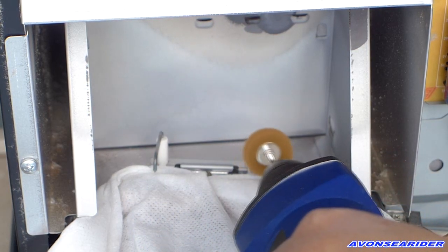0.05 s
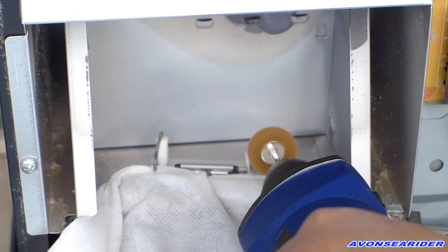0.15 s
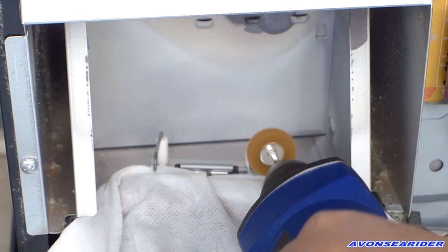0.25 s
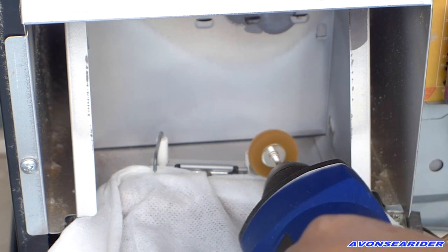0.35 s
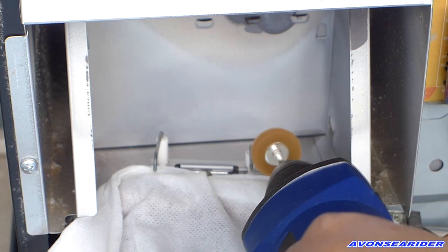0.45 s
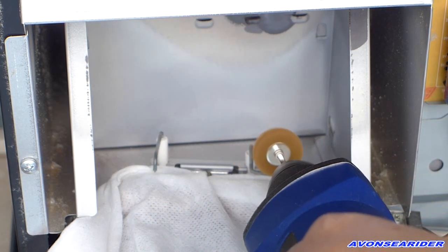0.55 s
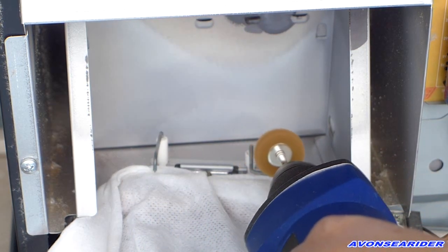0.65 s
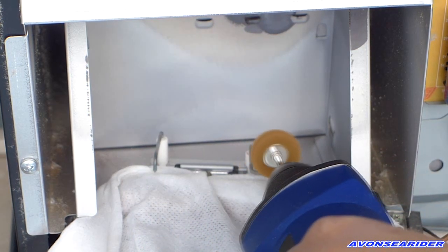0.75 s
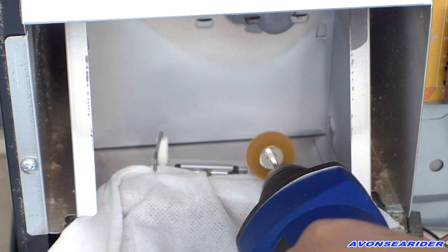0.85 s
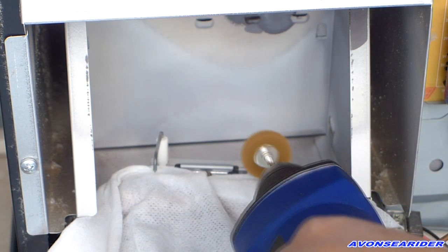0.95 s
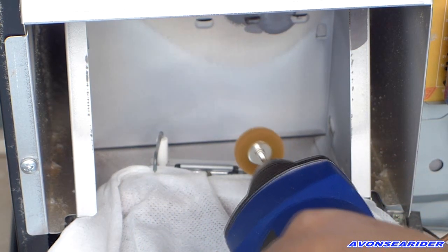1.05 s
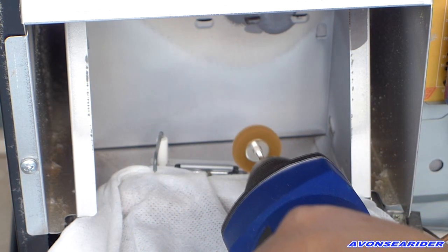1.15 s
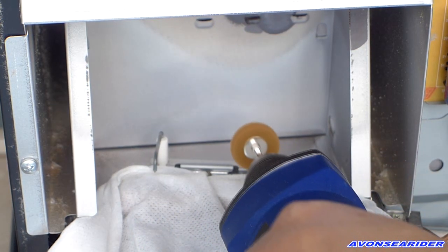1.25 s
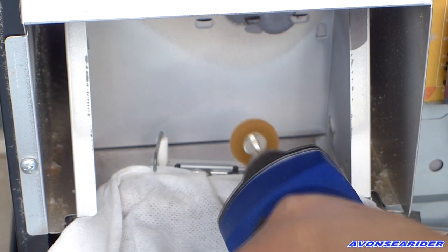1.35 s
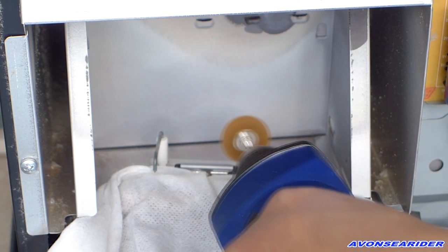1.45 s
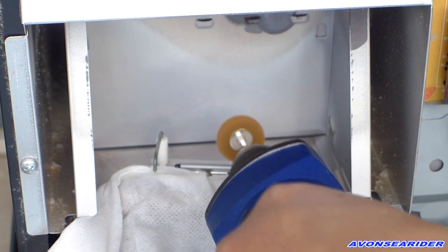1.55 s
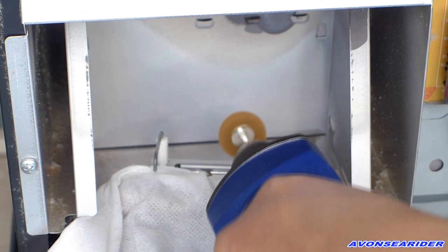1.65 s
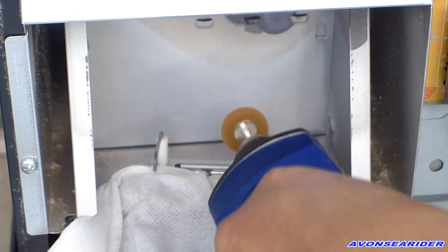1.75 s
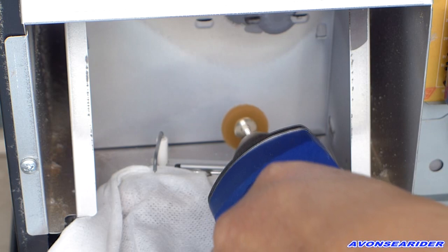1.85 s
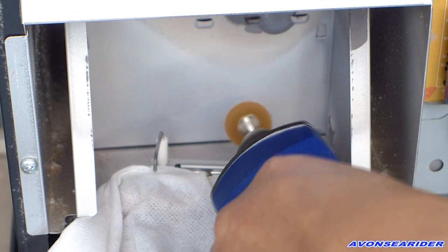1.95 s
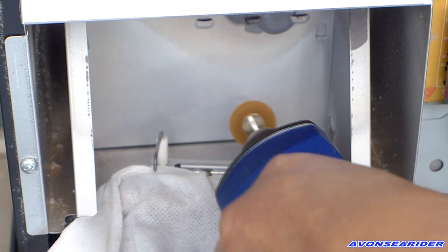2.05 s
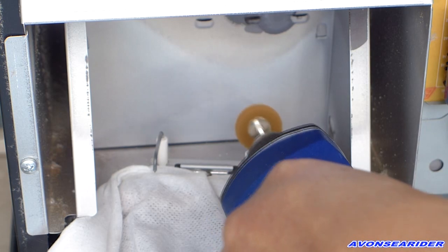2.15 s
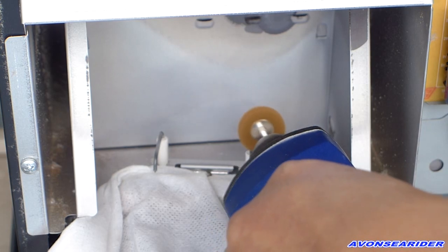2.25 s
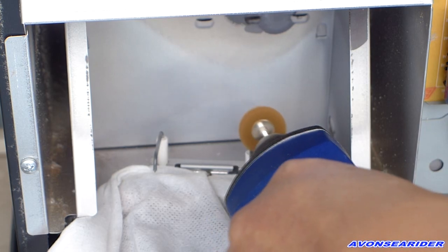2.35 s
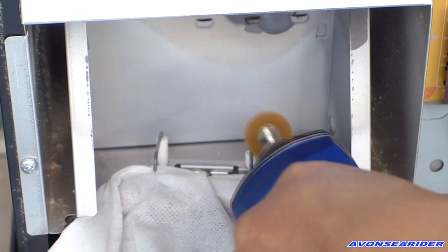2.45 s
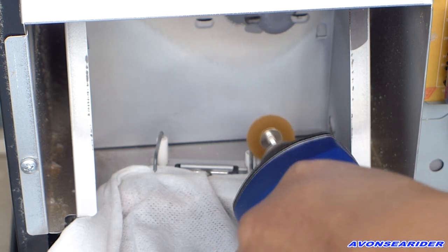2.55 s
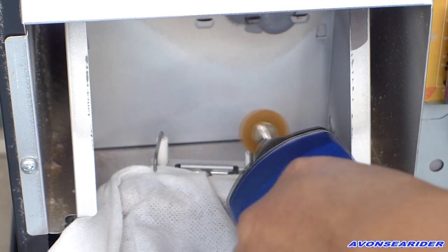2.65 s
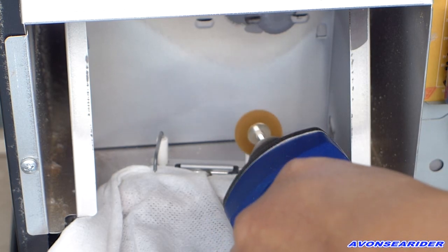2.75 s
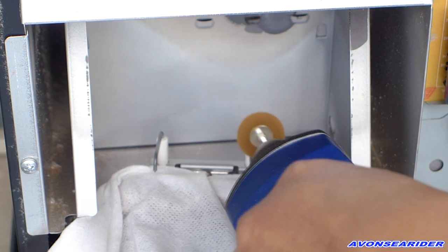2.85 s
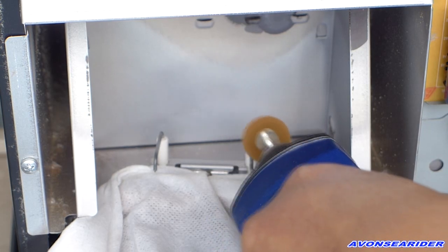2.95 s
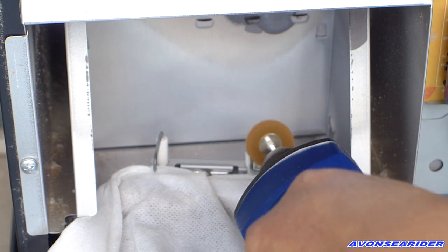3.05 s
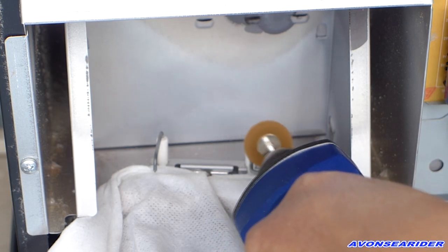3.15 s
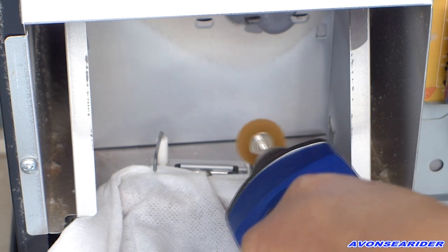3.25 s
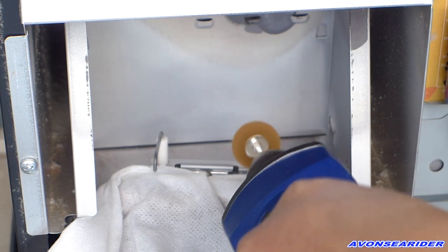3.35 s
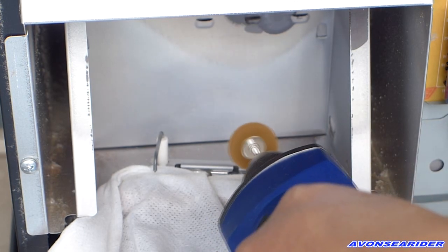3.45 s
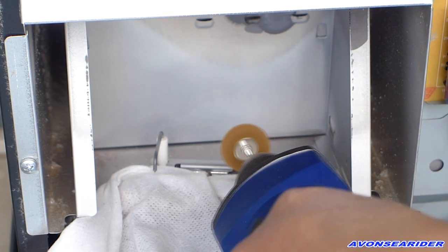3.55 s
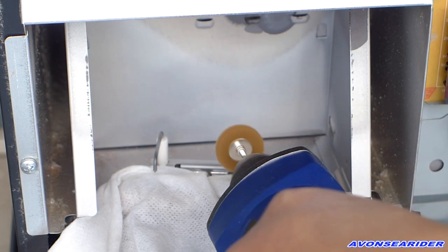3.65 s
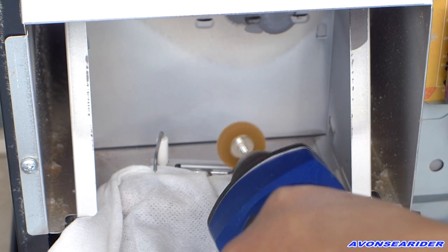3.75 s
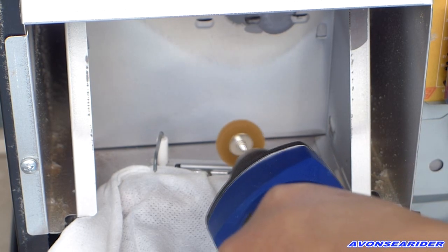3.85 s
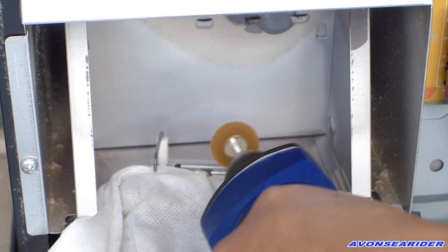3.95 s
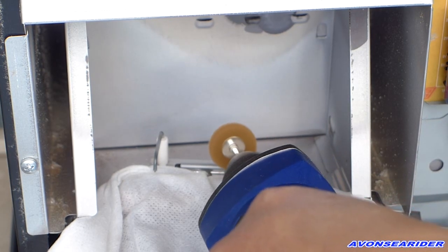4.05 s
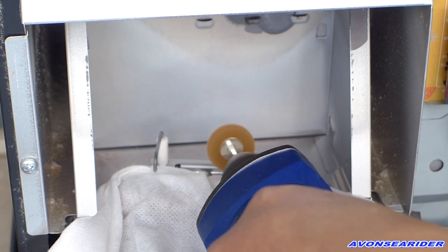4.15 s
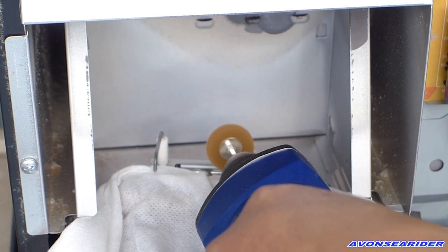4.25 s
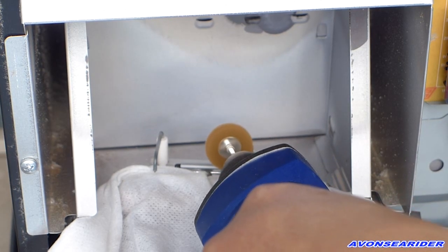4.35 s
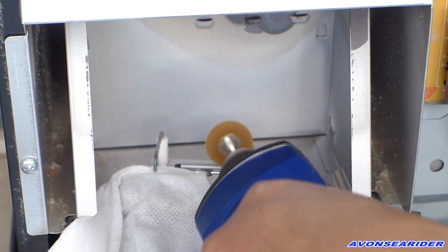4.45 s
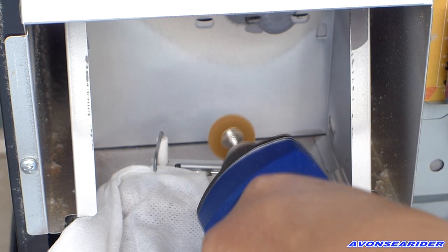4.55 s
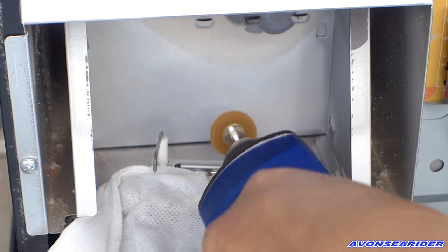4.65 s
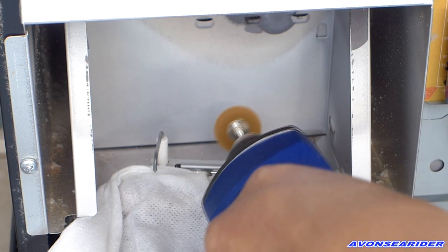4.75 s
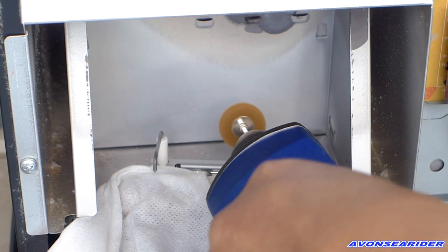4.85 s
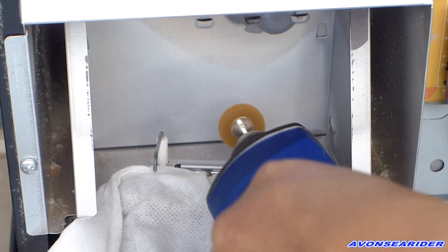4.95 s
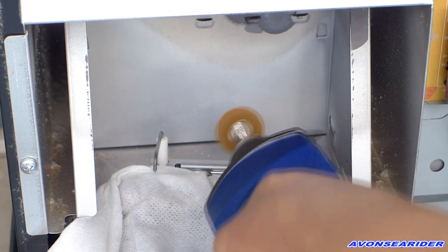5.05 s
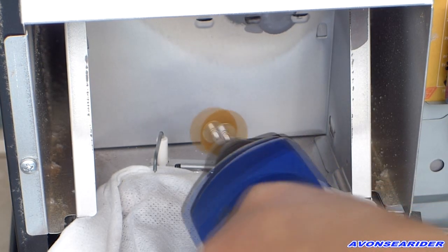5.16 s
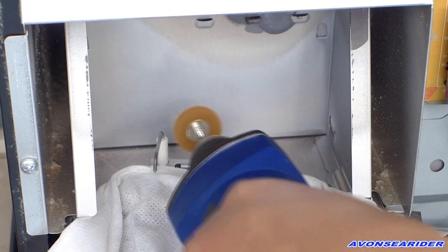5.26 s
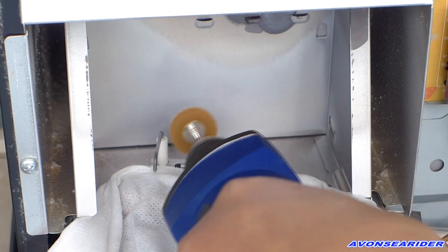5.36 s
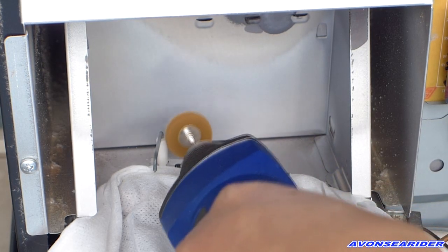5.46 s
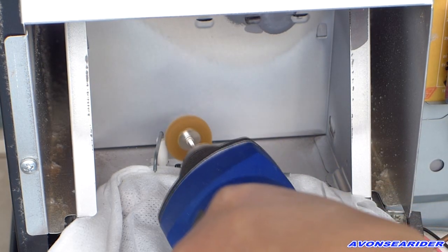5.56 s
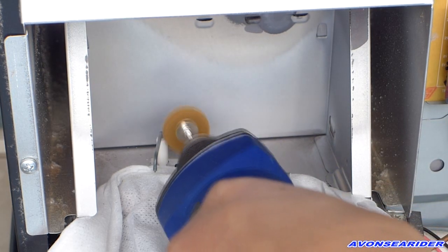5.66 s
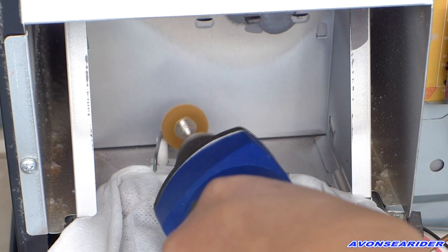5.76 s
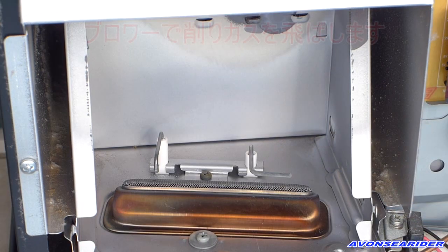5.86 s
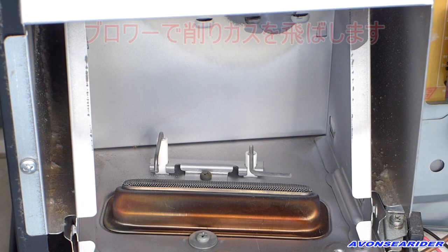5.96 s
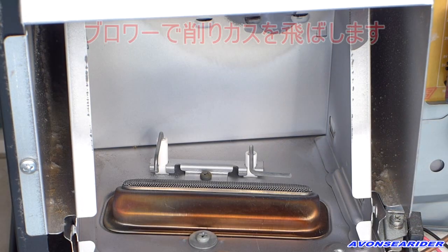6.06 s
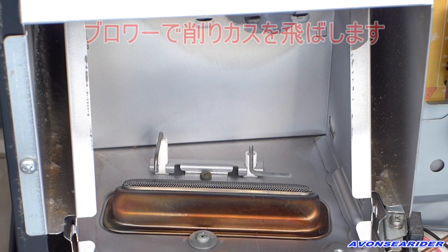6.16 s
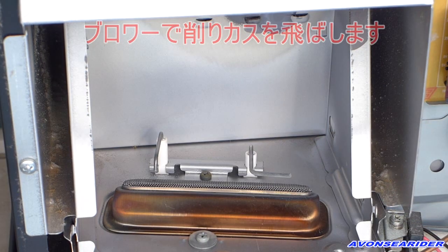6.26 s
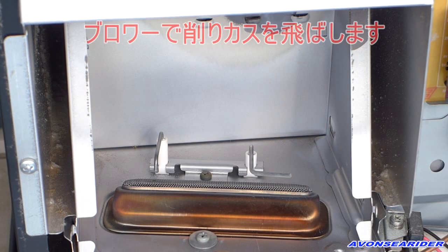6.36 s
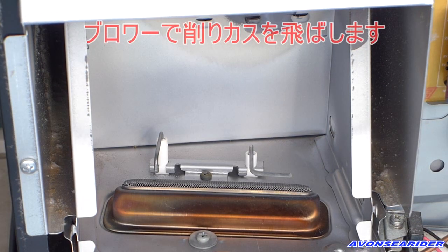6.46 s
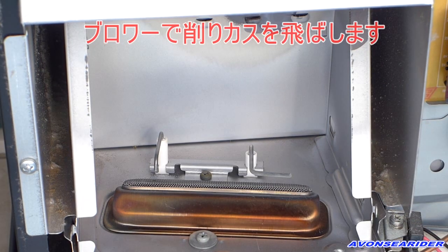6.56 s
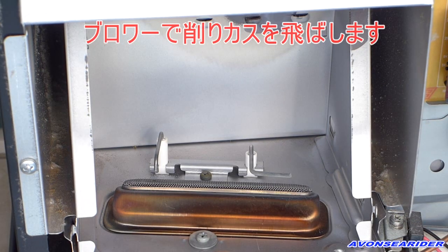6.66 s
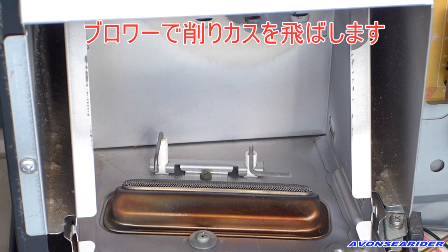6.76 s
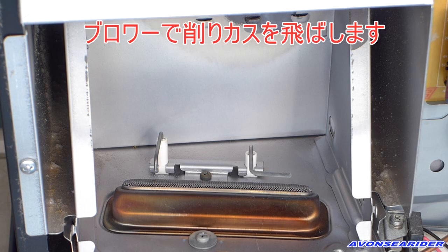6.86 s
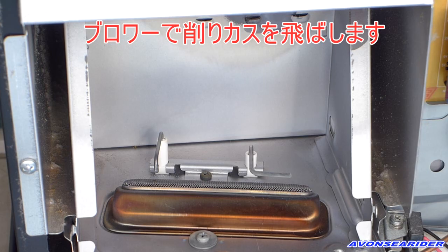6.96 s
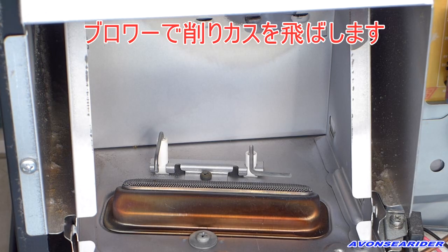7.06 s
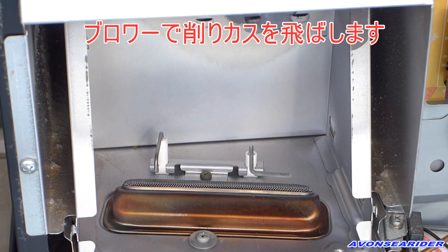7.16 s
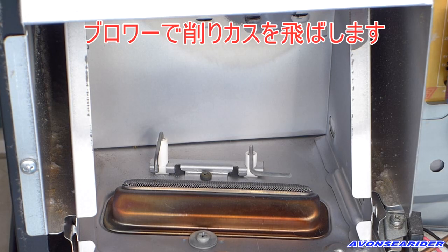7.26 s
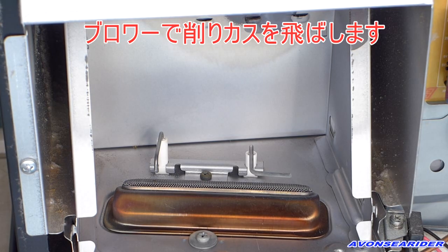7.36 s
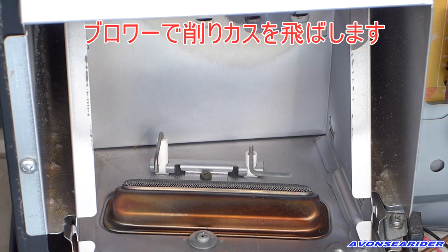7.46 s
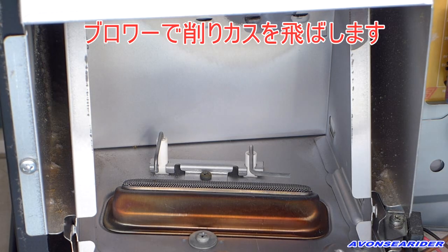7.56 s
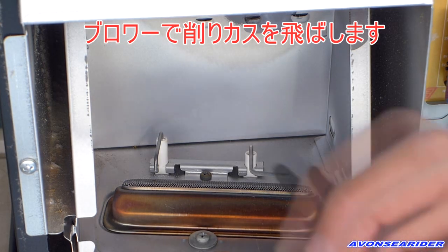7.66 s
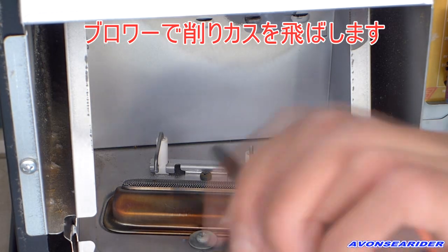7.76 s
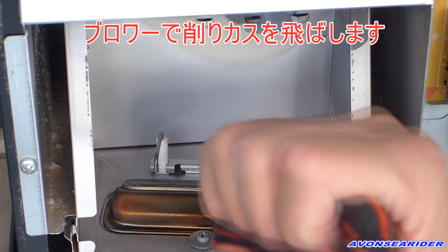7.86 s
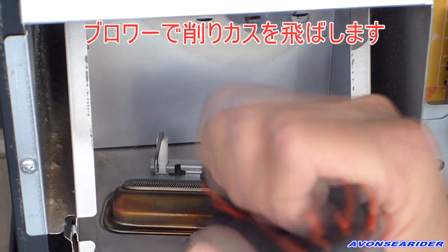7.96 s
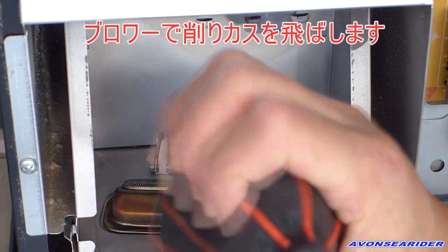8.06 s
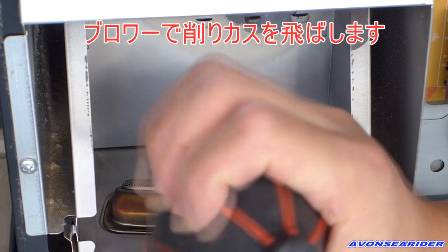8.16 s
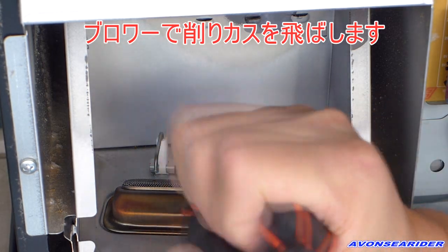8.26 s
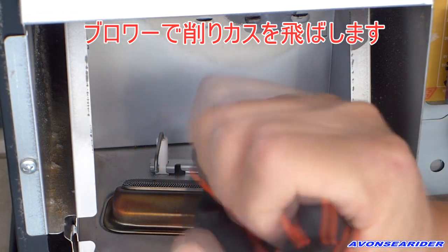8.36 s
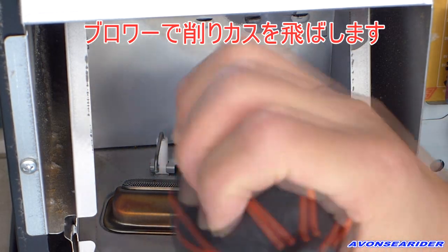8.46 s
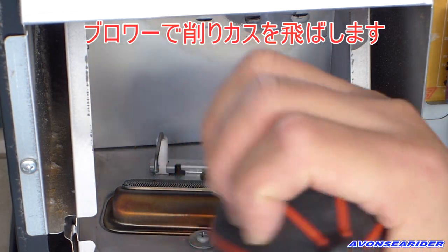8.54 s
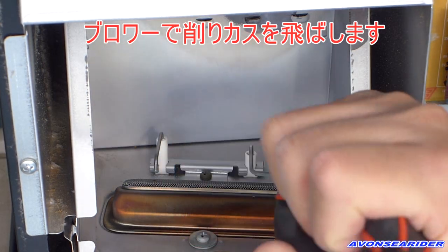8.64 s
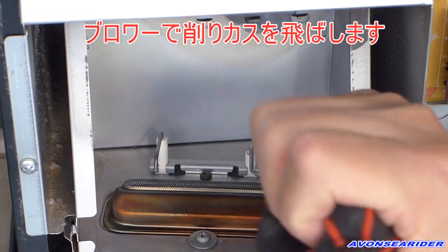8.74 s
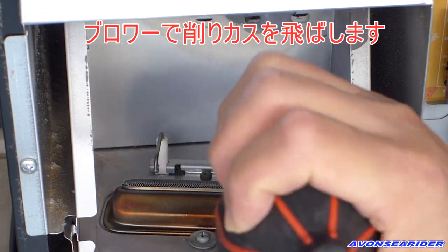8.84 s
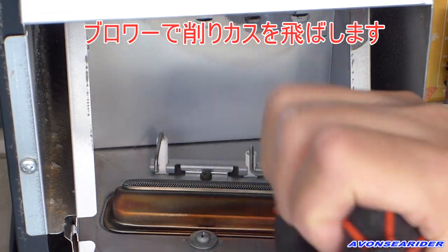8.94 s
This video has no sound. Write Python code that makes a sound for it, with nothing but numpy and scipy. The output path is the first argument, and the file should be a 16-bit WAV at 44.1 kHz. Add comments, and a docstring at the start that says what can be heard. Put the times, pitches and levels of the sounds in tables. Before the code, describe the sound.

Close up in a quiet room, a small electric rotary tool whines steadily inside a sheet-metal box, its wheel rubbing a plug with a buzzy, gritty, wavering rasp. It cuts off abruptly. Fingers rustle on a rubber bulb with a faint hollow note, a near-silent pause follows, then three quick hissing puffs, each trailed by a thin refill hiss.

```python
"""In a quiet room with a sheet-metal heater, a small mains rotary tool whines inside the heater box.
Its wheel rubs a plug: tones at multiples of the shaft speed, plus brush noise and grit; then it cuts off.
A rubber blower bulb is then handled (grainy shaped noise and a hollow note) and squeezed three times:
each puff is a burst of noise, followed by the thinner hiss of the bulb refilling through its valve."""
import sys
import numpy as np
from scipy import signal
from scipy.io import wavfile
from scipy.ndimage import uniform_filter1d

SR = 44100
rng = np.random.default_rng(int(sys.argv[2]) if len(sys.argv) > 2 else 0)


def log_audio(samples):
    """Write samples as a 16-bit WAV file to the path given in sys.argv[1]."""
    # one column per channel
    frames = np.atleast_2d(samples).T
    # limit to full scale, then quantise
    limited = np.clip(frames, -1, 1)
    pcm = np.round(limited * 32767).astype(np.int16)
    wavfile.write(sys.argv[1], SR, pcm)


N = 396900

# Noise spectra are scaled to an overall strength of 1 later, so their levels are relative, per Hz.
# how alike left and right are: [f/Hz, likeness from 0 to 1]
LIKENESS = [(60, 0.57), (180, 0.96), (550, 0.89), (1650, 0.82), (4970, 0.7), (15000, 0.73)]
# steady wash of the room: [f/Hz, level/dB]
ROOM = [(12, -17.5), (25, -17.5), (40, -36.5), (62, -43.5), (100, -48), (140, -13), (170, -10), (254, -8),
        (381, -5), (613, -6), (1130, -10), (1480, -13), (1810, -16.5), (2980, -32), (15500, -38.5)]
ROOM_DB = -43

# fingers and sleeve on rubber and cloth; the body levels are raised by BODY_LIFT_DB:
# [peak t/s, rustle level/dB, rise t/s, fall t/s, body level against rustle/dB]
HANDLING = [(6.192, -35.5, 0.017, 0.078, -2), (6.286, -51, .035, .06, 1), (6.395, -50, 0.068, .1, -4),
            (6.449, -45, .03, .2, 0), (6.537, -37.5, 0.083, 0.1, -8), (6.631, -23.5, 0.017, 0.064, -8),
            (6.71, -38, 0.026, 0.2, -10), (6.77, -26.5, .15, 0.065, -5), (7.256, -55.5, .1, 0.79, -25),
            (7.51, -63, 0.25, .15, -25.5), (7.803, -56, .06, .1, -28)]
BODY_LIFT_DB = 2.0
# rustle of the touches: [f/Hz, level/dB]
RUSTLE = [(1060, -41), (1800, -4.5), (2750, -5.5), (4090, -4.5), (4430, -3), (7820, -4.5), (12400, -8.5),
          (15500, -24)]
# the bulb's dull body sound: [f/Hz, level/dB]
BODY = [(150, -60), (400, -21), (800, -15), (1700, -21), (2600, -36)]
# resonances of the bulb: [f/Hz, width f/Hz, lift level/dB]
BULB_MODES = [(1034, 59, 10), (1320, 130, 11)]
# taps on the hollow bulb: [peak t/s, level/dB, rise t/s, fall t/s]
TAPS = [(6.454, -27.5, .014, .075), (6.52, -38, 0.1, 0.14)]
HOLLOW_HZ, WOBBLE_WIDTH_HZ = 598, 120.0
TOUCH_SPAN_DB = 25  # level change over one rise or fall time

# squeezes of the bulb; a negative lead puts the first rush after the peak:
# [peak t/s, jet level/dB, rise t/s, burst t/s, push after burst t/s, roar level against jet/dB,
#  first-rush level/dB, first-rush lead t/s]
PUFFS = [(7.962, -12.5, 0.072, 0.0049, 0.051, -14, -16.5, 0.011),
         (8.329, -14, 0.039, 0.0083, 0.069, -14.5, -30.5, 0.0018),
         (8.71, -16, 0.043, 0.03, 0.044, -14, -29, -0.011)]
# levels against the peak of a puff, and times in seconds
RISE_DB, SAG_DB, SAG_S, PUSH_DB, FALL_DB, FALL_S = -40, -7.5, 0.025, -11, -37.5, 0.075
RUSH_RISE_S, RUSH_FALL_S = 0.031, 0.062
# air leaving the bulb: [f/Hz, level/dB]
JET = [(1470, -36), (2500, -2), (3140, -9.5), (4010, -2), (4370, -7), (5210, -2.5), (6400, -5), (12000, -7),
       (15500, -18)]
# air striking the metal: [f/Hz, level/dB]
ROAR = [(120, -58), (300, -17), (700, -1.5), (1400, 4), (2300, 5.5), (3500, -15)]
# refills through the valve: [start t/s, end t/s, level at start/dB, level just before the end/dB]
REFILLS = [(8.107, 8.235, -32.5, -29), (8.498, 8.62, -32, -32.5), (8.876, 9.05, -33.5, -34.5)]
VALVE_OPEN_S, VALVE_CLOSE_S = 0.024, 0.03
# hiss of the valve: [f/Hz, level/dB]
VALVE = [(880, -65), (1500, -43), (1820, -34), (2170, -35), (2400, -24), (3380, -23), (4350, -17.5),
         (4800, -10.5), (5350, -13), (6380, -6), (9520, -13), (11400, -0.5), (15500, -30)]

# shaft speed, sagging under load: [t/s, turns f/Hz]
SPEED = [(0.0, 176.66), (0.42, 177.4), (0.6, 176.95), (1.26, 176.8), (1.48, 175.55), (1.94, 175.3),
         (2.1, 174.8), (2.56, 175.3), (2.71, 173.8), (3.45, 173.3), (3.79, 174.65), (4.1, 174.58),
         (4.59, 171.44), (4.82, 169.24), (4.99, 166.6), (5.12, 165.54), (5.55, 173.05), (5.88, 176.36)]
# commutator whine, 24 bars a turn: [t/s, level/dB]
WHINE = [(0.0, -29.5), (1.24, -35), (1.41, -29), (1.71, -44), (1.78, -25), (1.94, -29), (2.03, -22.5),
         (2.24, -28.5), (2.42, -22.5), (2.81, -30), (3.27, -23), (4.2, -22), (4.33, -28.5), (4.55, -14.5),
         (4.68, -20), (4.97, -23.5), (5.15, -19.5), (5.23, -23), (5.47, -12), (5.54, -22), (5.71, -19.5),
         (5.88, -26)]
# the line one mains ripple below the whine swells when the whine dips, and fades when it peaks
LOWER_DB, TRADE, WAVER_DB = -34, 0.8, 1.44
# slowly wavering motor lines: [shaft order, offset in mains ripples, early level/dB, late level/dB]
MOTOR = [(24, 1, -42, -37), (24, -2, -35, -45), (24, 2, -45, -44), (48, 0, -36, -49), (72, 0, -56, -49),
         (71, 0, -58, -50), (22, 0, -42, -38), (23, 0, -39, -38), (25, 0, -43, -40), (26, 0, -44, -43),
         (12, -1, -46, -50), (18, 0, -50, -44), (21, 0, -48, -46), (29, 0, -50, -49)]
RIPPLE_HZ, CUT_S = 100.2, 5.895  # mains ripple; moment when the tool goes silent
# brush and fan noise: [f/Hz, level/dB]
BRUSHES = [(120, -52), (200, -21.5), (769, -10.5), (906, -3.5), (1150, -14.5), (1400, -2), (2130, -8.5),
           (2700, -13.5), (3680, -7), (4110, -6), (4670, -7), (12700, -16), (15500, -39)]
BRUSH_DB = -27.0
# air modes of the heater box: [f/Hz, width f/Hz, lift level/dB]
CABINET = [(995, 66, 9.5), (1340, 69, 3.5), (2350, 680, 6.5), (4030, 200, 3)]
# noise of the grit: [f/Hz, level/dB]
GRIT = [(300, -30), (1000, -12), (3000, -12), (5000, -2), (7500, 0), (9500, -6), (11000, -3), (15600, -20)]
# wheel pressing on the work shakes the housing, before lifts and shake:
# [t/s, order 2 level/dB, order 3 level/dB, order 4 level/dB]
PRESSING = [(0.0, -30.5, -21.5, -36.5), (0.22, -31, -17.5, -30), (0.36, -33, -18.5, -32.5),
            (0.48, -31.5, -15, -24), (0.77, -41.5, -17.5, -31), (0.86, -29.5, -17, -27),
            (1.14, -27, -17.5, -30), (1.27, -39, -24.5, -36.5), (1.4, -31, -33, -36), (1.72, -36, -33, -42),
            (2.19, -50, -49, -44), (2.67, -52, -28.5, -49), (2.84, -45, -38, -42),
            (3.3, -50.5, -35.5, -40.5), (3.55, -33, -25.5, -34.5), (3.64, -39, -27, -32),
            (3.69, -38, -26.5, -43), (3.82, -37.5, -26, -36.5), (4.0, -35, -28.5, -38.5),
            (4.15, -30, -23.5, -38), (4.43, -38, -28.5, -38.5), (4.78, -32.5, -41, -27.5),
            (4.98, -38, -45, -43.5), (5.04, -60, -42, -32.5), (5.22, -62, -51, -57), (5.88, -56, -62, -68)]
SHAKE_DB = 1.65  # unsteady hand on these low orders
BUZZ_DB, BUZZ_REST_DB = 0.5, -40.5  # the panel buzzes with order 4, and faintly without it
# wheel rubbing, before lifts and chatter: [t/s, ring level/dB, scrape base level/dB]
RUBBING = [(0.0, -31.5, -34.5), (0.55, -26, -32), (0.94, -25, -33), (1.15, -31, -42), (1.33, -28.5, -30),
           (1.51, -26, -31), (1.69, -22.5, -25.5), (1.95, -34, -26.5), (2.07, -28.5, -24.5),
           (2.33, -31.5, -27), (2.63, -25, -21.5), (2.73, -26.5, -23.5), (2.9, -31.5, -24),
           (3.32, -28.5, -26), (3.65, -28.5, -29.5), (3.82, -22, -26.5), (4.15, -22, -25.5),
           (4.59, -31.5, -24.5), (5.11, -30.5, -24), (5.22, -38.5, -37.5), (5.88, -38, -37)]
# resonances that move with grip and contact spot: [t/s, ring f/Hz, scrape f/Hz]
SPOT = [(0.0, 2140, 5700), (0.48, 2340, 5600), (1.2, 2240, 5700), (1.36, 2150, 7040), (1.57, 2140, 5200),
        (1.72, 2140, 7080), (2.08, 2000, 6700), (2.29, 2300, 6130), (2.52, 2150, 5300), (2.62, 2210, 6900),
        (2.74, 2160, 5200), (3.1, 2270, 5500), (3.66, 1980, 5350), (4.0, 2160, 5250), (4.18, 1900, 7100),
        (4.4, 1840, 7700), (4.62, 2170, 7000), (4.94, 1820, 6000), (5.12, 1830, 6230), (5.25, 2220, 5500)]
RING_WIDTH_HZ, SCRAPE_WIDTH_HZ = 610, 800  # the ring's curve is squared afterwards
# how bit and plug colour the scrape: [f/Hz, level/dB]
SCRAPE = [(2500, -1.5), (3000, -11), (3500, -0.5), (4000, -14), (4400, -1.5), (5100, -3), (5500, -7.5),
          (8000, -2.5), (9300, -10), (10000, -9), (10900, -4.5), (11600, -17), (13000, -10), (15300, -21)]
# the bit's top mode rises in level as the scrape climbs in pitch
BIT_HZ, BIT_WIDTH_HZ, BIT_LIFT_DB, BIT_DB_PER_KHZ = 10900, 1400, 2.5, 3.0
# the wheel lifts off the plug for a moment: [deepest t/s, drop level/dB, fade t/s]
LIFTS = [(0.157, 6, 0.077), (0.315, 8.5, .07), (0.619, 8, 0.095), (0.786, 1, .045), (0.91, 12, 0.05),
         (1.05, 0.5, .07), (1.217, 5.5, 0.12), (1.61, 7, 0.091), (1.9, 4, 0.09), (2.162, 14, 0.087),
         (2.27, 5, 0.11), (2.5, 13.5, 0.099), (2.585, 8, 0.057), (2.788, 6.5, 0.076), (3.09, 1.5, 0.24),
         (3.393, 3, 0.092), (3.6, 10, 0.043), (3.779, 13, 0.057), (3.868, 5, 0.031), (4.075, 1, .06),
         (4.26, 3.5, 0.065), (4.78, 2, 0.1)]
# share of each drop felt by: [order 2, order 3, order 4, ring, scrape]
LIFT_SHARES = [0.78, 1, 1, 1, 0.79]
RETURN = 0.45  # the wheel lands again faster than it left: share of the fade time

OFFSET, EDGE_HZ = -.0029, 15660  # steady shift of the wave; upper limit of the sound

TOOL_N = round(CUT_S * SR)
TOOL_T = np.arange(TOOL_N) / SR
SLOW_T = np.arange(0, CUT_S + .01, .01)  # coarse clock in seconds for the tool's slow changes


def gain_of(db):
    """Turns decibels into a factor."""
    return 10 ** (np.asarray(db) / 20)


def evened(x):
    """Scales a signal to an average (rms) strength of 1."""
    return x / np.sqrt(np.mean(x ** 2) + 1e-20)


def read(points, hz):
    """Reads a spectrum table between its points, on a log-frequency axis."""
    f, value = np.transpose(points)
    return np.interp(np.log(hz + 1), np.log(f + 1), value)


def columns(rows, t):
    """Reads every column of a time table at the times t."""
    s, *values = np.transpose(rows)
    return [np.interp(t, s, v) for v in values]


def bump(hz, centre_hz, width_hz):
    """Shape of a resonance: 1 at its centre, half at the edges of its width."""
    return 1 / (1 + (2 * (hz - centre_hz) / width_hz) ** 2)


def wander(count, length, size):
    """Slow random curves of rms 1, smoothed twice over size steps."""
    raw = rng.standard_normal((count, length))
    return evened(uniform_filter1d(uniform_filter1d(raw, size), size))


def noise(shape, modes=(), patchy_db=0.5, size=512):
    """Stereo noise of rms 1 with a spectrum, raised resonances and drifting patches."""
    frames, hz = 4 * N // size + 5, np.fft.rfftfreq(size, 1 / SR)
    a, b, c, d, patches = rng.standard_normal((frames, len(hz), 5)).T
    patches = uniform_filter1d(patches, size=6, axis=0)
    patches = evened(uniform_filter1d(patches, size=12, axis=1))
    db = read(shape, hz) + sum(lift * bump(hz, f, w) for f, w, lift in modes)
    same = np.clip(read(LIKENESS, hz), -1, 1)[:, None]
    left = a + 1j * b
    right = same * left + np.sqrt(1 - same ** 2) * (c + 1j * d)
    spectrum = np.array([left, right]) * gain_of(db[:, None] + patchy_db * patches)
    return evened(signal.istft(spectrum, nperseg=size, noverlap=3 * size // 4)[1][:, :N])


def envelope(tables, column=0):
    """Sums gain curves (first column, or first plus another in dB), silent outside their tables."""
    t, out = np.arange(N) / SR, np.zeros(N)
    for rows in tables:
        values = columns(rows, t)
        inside = np.minimum(t - rows[0][0], rows[-1][0] - t)
        edge = np.clip(inside / .004 + .5, 0, 1)  # 4 ms ramps avoid clicks
        out += edge * gain_of(values[0] + (values[column] if column else 0))
    return out


def touches(rows):
    """Makes rise-and-fall tables whose slopes both run on into silence."""
    low = 2 * TOUCH_SPAN_DB
    return [[(s - 2 * rise, db - low, *more), (s, db, *more), (s + 2 * fall, db - low, *more)]
            for s, db, rise, fall, *more in rows]


def room():
    """The steady wash of the room: low-heavy shaped noise."""
    return gain_of(ROOM_DB) * noise(ROOM, patchy_db=2.5, size=2048)


def hollow_note():
    """Taps make the hollow bulb sound one note, whose strength wobbles at random."""
    smoothing = [1, -np.exp(-np.pi * WOBBLE_WIDTH_HZ / SR)]
    wobble = evened(signal.lfilter([1], smoothing, rng.standard_normal(N)))
    tone = np.sqrt(2) * np.cos(2 * np.pi * HOLLOW_HZ * np.arange(N) / SR)
    return envelope(touches(TAPS)) * (1 + .35 * wobble) * tone


def handling():
    """Rubbing touches give a grainy rustle, with the bulb's duller body under it and its hollow note."""
    grain = gain_of(1.0 * wander(count=1, length=N, size=60))
    curves = touches(HANDLING)
    body = gain_of(BODY_LIFT_DB) * envelope(curves, column=1) * noise(BODY, BULB_MODES)
    rustle = envelope(curves) * noise(RUSTLE, patchy_db=1.0)
    return grain * (rustle + body) + hollow_note()


def squeeze(s, db, rise, burst, push):
    """A puff of squeezed air: quick rise, burst, sag to a weakening push, release."""
    end = s + burst + push
    return [(s - 1.7 * rise, db + 1.5 * RISE_DB), (s - rise, db + RISE_DB), (s, db), (s + burst, db),
            (s + burst + SAG_S, db + SAG_DB), (end, db + PUSH_DB), (end + FALL_S, db + FALL_DB)]


def puffs():
    """Fast swirling air hisses as a jet, and roars where it strikes the metal."""
    jet = envelope([squeeze(*row[:5]) for row in PUFFS]) * noise(JET, patchy_db=1.5, size=256)
    roars = [squeeze(s, db + under, *times) for s, db, *times, under, _, _ in PUFFS]
    rushes = touches([(s - lead, db, RUSH_RISE_S, RUSH_FALL_S) for s, *_, db, lead in PUFFS])
    roar = (envelope(roars) + envelope(rushes)) * noise(ROAR, patchy_db=3.0, size=256)
    return jet + roar


def refills():
    """Air drawn back through the narrow valve makes a thin, patchy hiss."""
    curves = [[(a - VALVE_OPEN_S, first_db - 14), (a, first_db), (b - .02, last_db),
               (b, last_db - 12.0), (b + VALVE_CLOSE_S, last_db - 27)]
              for a, b, first_db, last_db in REFILLS]
    return envelope(curves) * noise(VALVE, patchy_db=4.0)


def blower():
    """Squeezed air puffs with a fluttering level, then the bulb refills."""
    flutter = gain_of(0.5 * wander(count=1, length=N, size=40))
    return flutter * puffs() + refills()


def contact():
    """Levels in dB of orders 2 to 4, ring and scrape: the wheel presses, lifts off and chatters."""
    lifted = sum(drop * np.interp(SLOW_T, [s - fade, s, s + RETURN * fade], [0, 1, 0])
                 for s, drop, fade in LIFTS)
    levels = columns(PRESSING, SLOW_T) + columns(RUBBING, SLOW_T)  # joins the two lists
    *thump, ring, scrape = levels - np.outer(LIFT_SHARES, lifted)
    chatter = 1.3 * wander(count=1, length=len(SLOW_T), size=2)[0]
    return thump, ring, scrape + chatter


def wheel_lines(thump, ring, scrape):
    """The uneven wheel drives whole multiples (orders) of the shaft speed; resonances favour some."""
    buzz = 20 * np.log10(np.hypot(gain_of(thump[2] + BUZZ_DB), gain_of(BUZZ_REST_DB)))
    ring_hz, scrape_hz = columns(SPOT, SLOW_T)
    bit_db = BIT_LIFT_DB + BIT_DB_PER_KHZ * (scrape_hz - scrape_hz.mean()) / 1e3
    order = np.arange(89)[:, None]
    hz = order * columns(SPEED, SLOW_T)[0]
    # every order swells and fades on its own as the contact patch moves, the high ones most
    drift_db = np.clip(order / 6, 3.2, 4.5) * wander(count=len(order), length=len(SLOW_T), size=9)
    drift = gain_of(drift_db)
    buzz_shape = (order > 4) * (order < 10)
    ring_shape = (order > 9) * (order < 18) * (bump(hz, ring_hz, RING_WIDTH_HZ) ** 2 + .06)
    colour = gain_of(read(SCRAPE, hz) + bit_db * bump(hz, BIT_HZ, BIT_WIDTH_HZ))
    scrape_shape = (order > 14) * colour * (1 + 1.8 * bump(hz, scrape_hz, SCRAPE_WIDTH_HZ))
    groups = [(buzz, buzz_shape), (ring, ring_shape), (scrape + 1.5, scrape_shape)]
    # the orders of a group share its level
    levels = sum(gain_of(db) * drift * shape / np.linalg.norm(drift * shape, axis=0)
                 for db, shape in groups)
    levels[2:5] = gain_of(thump + SHAKE_DB * wander(count=3, length=len(SLOW_T), size=3))
    return [(k, 0, levels[k]) for k in range(2, len(order))]


def whine_lines():
    """The 24 commutator bars sound once each turn; a second line lies one mains ripple below."""
    waver = WAVER_DB * wander(count=1, length=len(SLOW_T), size=2)[0]
    whine_db = columns(WHINE, SLOW_T)[0] + waver
    swell_db = whine_db - uniform_filter1d(whine_db, size=50)
    lower_db = LOWER_DB - TRADE * np.clip(swell_db, -5.5, 12)
    return [(24, 0, gain_of(whine_db)), (24, -1, gain_of(lower_db))]


def motor_lines():
    """Motor tones at shaft orders, some moved by mains ripples, each slowly wavering."""
    wavers = 2.17 * wander(count=len(MOTOR), length=len(SLOW_T), size=8)
    return [(k, m, gain_of(np.interp(SLOW_T, [1.3, 1.8], [early, late]) + waver))
            for (k, m, early, late), waver in zip(MOTOR, wavers)]


def tones(lines, turns, ripples, side=0.22):
    """Sounds each line (shaft order, ripple offset, gain curve) as a cosine following the shaft."""
    out = np.zeros((2, TOOL_N))
    for (k, m, level), (start, tilt) in zip(lines, rng.random((len(lines), 2))):
        # reflections in the box shift each line a little differently on the two sides
        shift = side * min(k / 8, 1) * (2 * tilt - 1) * np.array([[-1], [1]])
        angle = 2 * np.pi * (k * turns + m * ripples + start) + shift
        out += np.sqrt(2) * np.interp(TOOL_T, SLOW_T, level) * np.cos(angle)
    return out


def brushes(ripples):
    """Brushes spark with each half wave of the mains, so their noise pulses at the ripple."""
    sparks = gain_of(BRUSH_DB) * (1 + .4 * np.cos(2 * np.pi * ripples))
    return sparks * noise(BRUSHES, CABINET, patchy_db=.7, size=1024)[:, :TOOL_N]


def grit(turns, scrape):
    """Grit bites once a turn, so its noise pulses with the shaft and follows the scrape."""
    bites = 1 + np.cos(2 * np.pi * turns)
    level = gain_of(np.interp(TOOL_T, SLOW_T, scrape) - 10)
    return level * bites * noise(GRIT)[:, :TOOL_N]


def tool():
    """The turning shaft drives wheel, whine and motor tones, with brush noise and grit."""
    turns = np.cumsum(columns(SPEED, TOOL_T)[0]) / SR
    ripples = RIPPLE_HZ * TOOL_T
    thump, ring, scrape = contact()
    lines = wheel_lines(thump, ring, scrape) + whine_lines() + motor_lines()
    out = tones(lines, turns, ripples) + brushes(ripples) + grit(turns, scrape)
    return np.pad(out, ((0, 0), (0, N - TOOL_N)))


def scene():
    """All sources over the room's steady wash."""
    return room() + handling() + blower() + tool()


def record(dry):
    """Channel balance, a small steady offset and the band limit."""
    tilted = dry * gain_of([[-.15], [.15]])  # the right side is slightly louder
    low_pass = signal.firwin(1023, EDGE_HZ, window=("kaiser", 9), fs=SR)
    return OFFSET + signal.oaconvolve(tilted, low_pass[None], "same")


dry = scene()
out = record(dry)
log_audio(out)
```